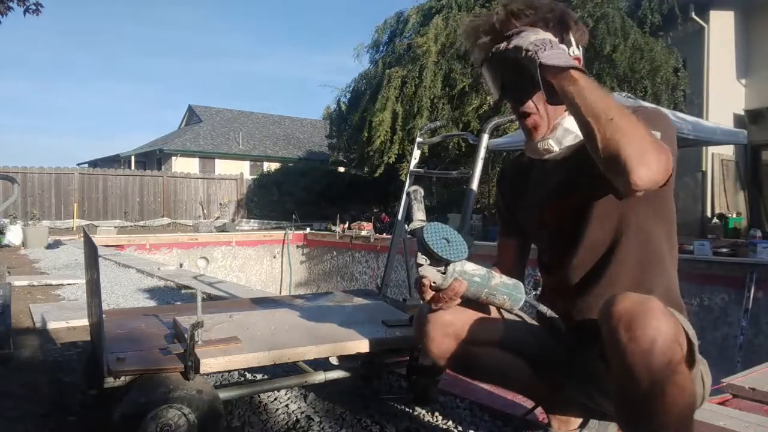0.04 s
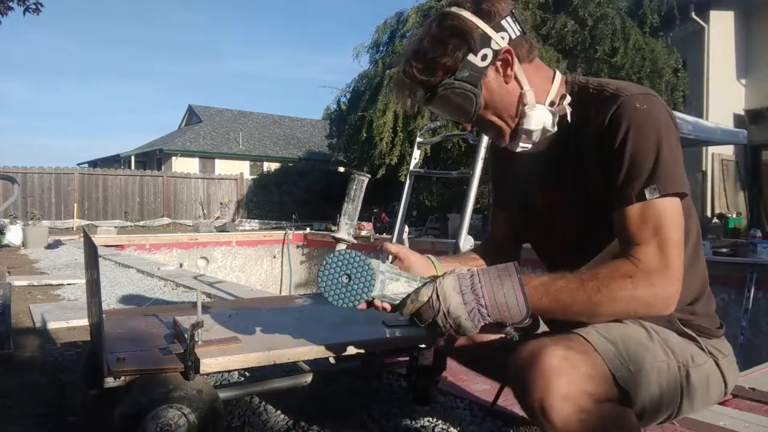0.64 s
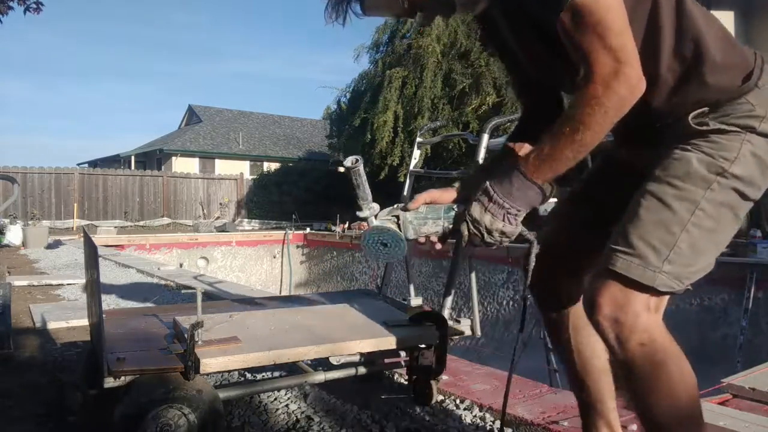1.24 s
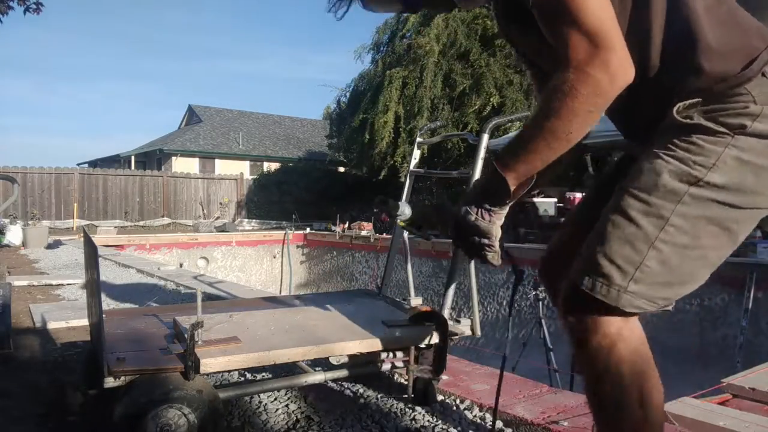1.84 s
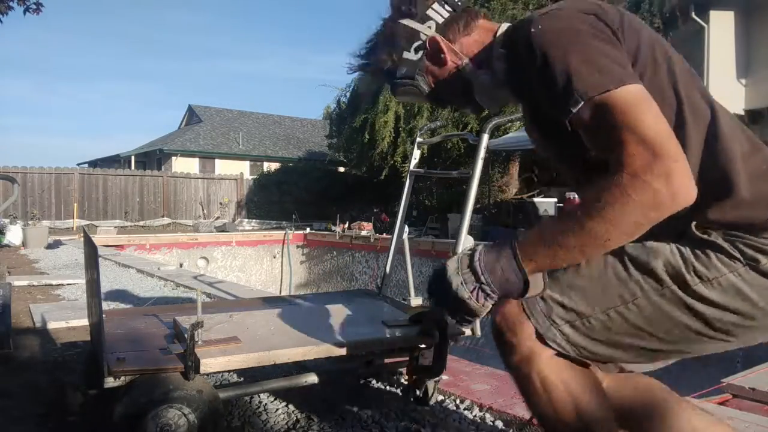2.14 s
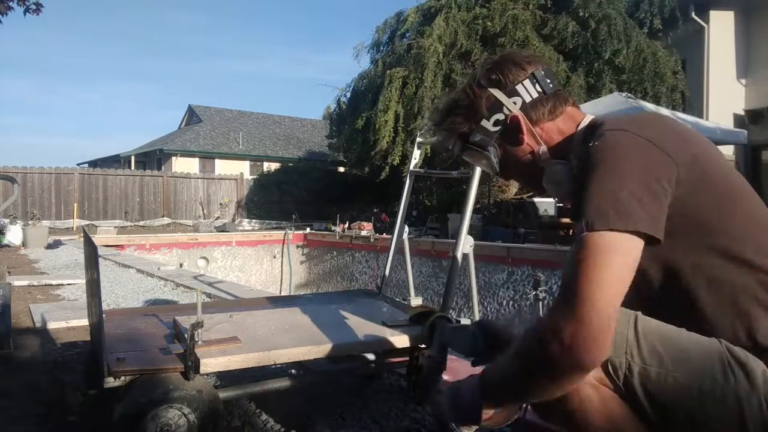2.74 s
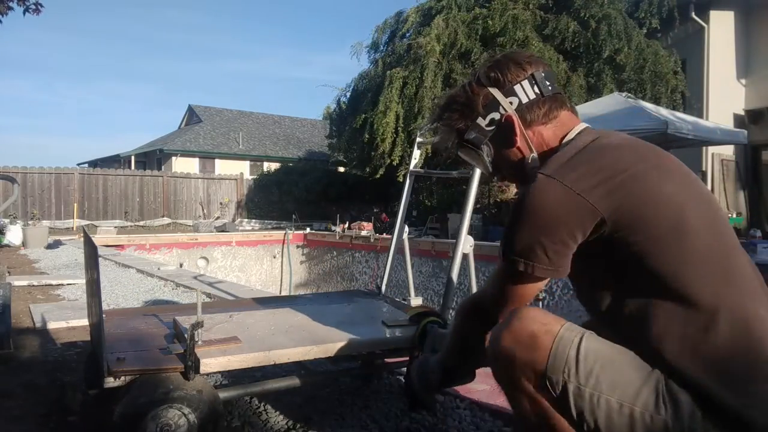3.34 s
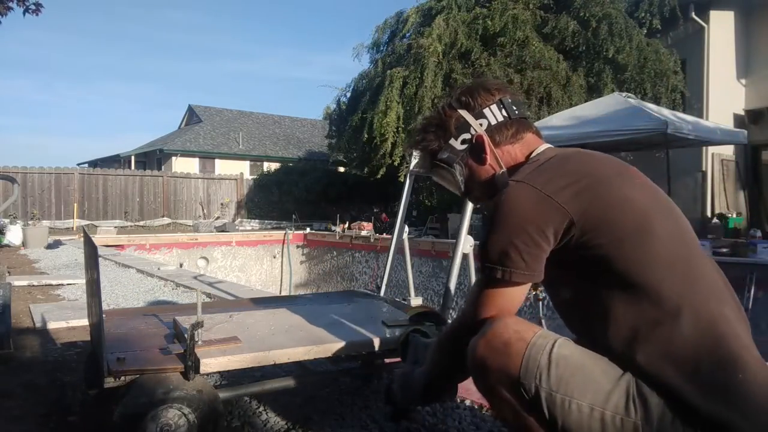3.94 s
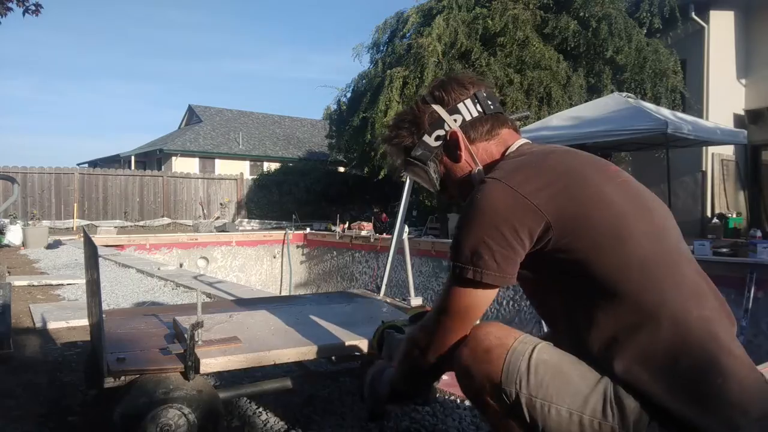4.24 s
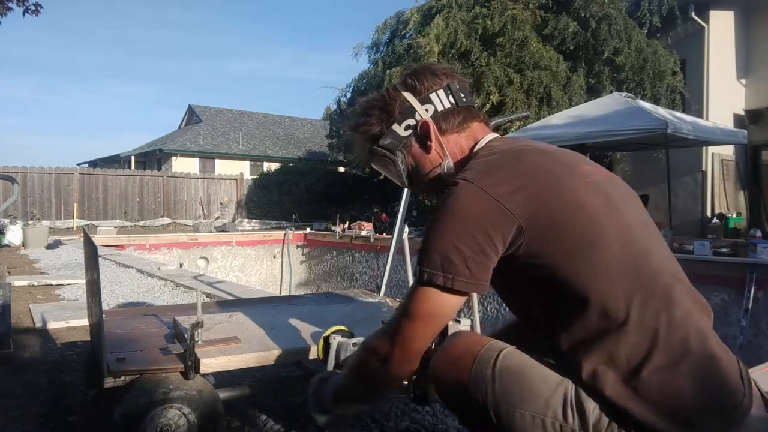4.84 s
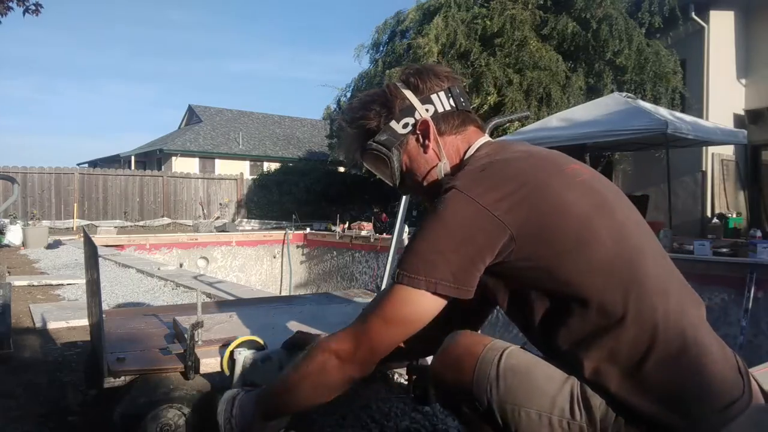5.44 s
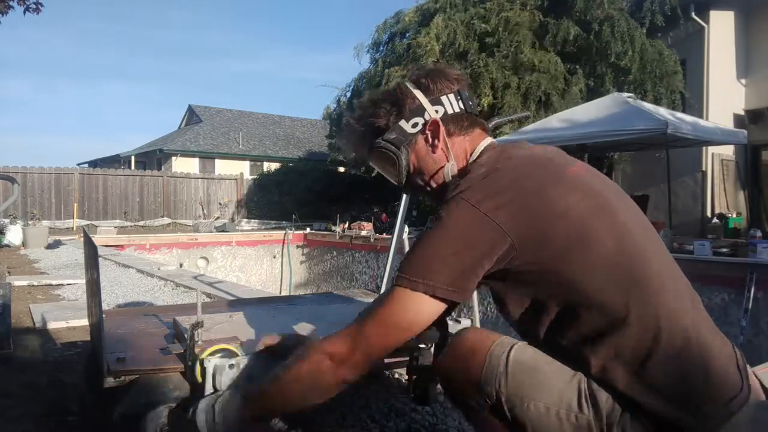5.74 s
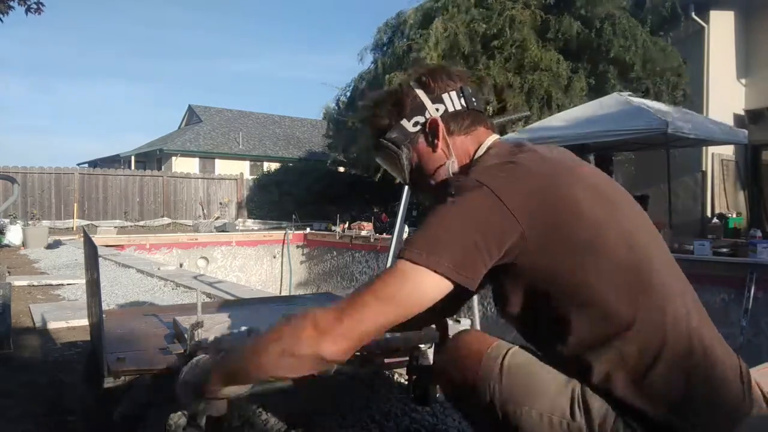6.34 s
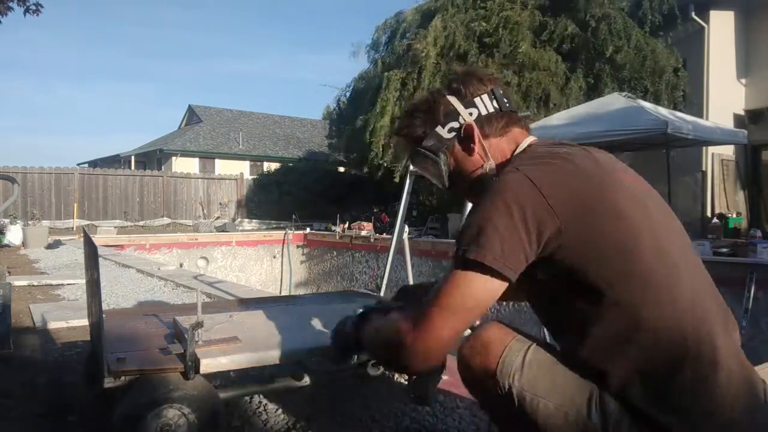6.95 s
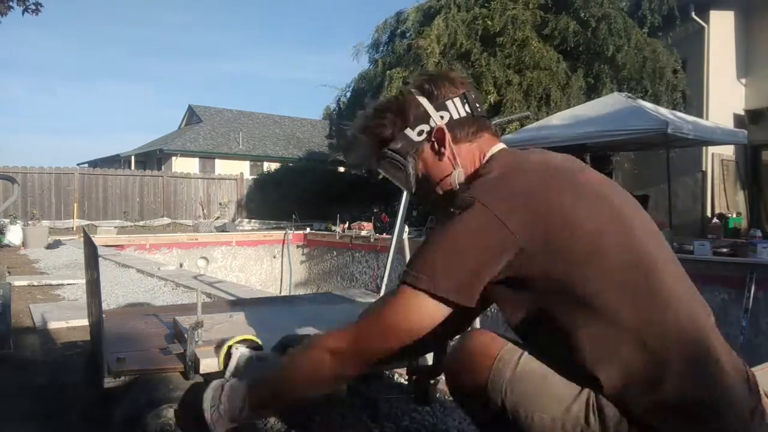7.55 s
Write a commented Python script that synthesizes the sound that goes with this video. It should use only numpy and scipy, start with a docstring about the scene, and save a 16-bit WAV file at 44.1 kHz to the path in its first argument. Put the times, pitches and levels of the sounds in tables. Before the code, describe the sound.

Gloves rustle, then an angle grinder spins up, grinds stone with a rising squeal and shifts into fast, hissing, wavering whistles.

```python
"""Angle grinder polishing stone

In a quiet yard, gloves handle an angle grinder and switch it on. Its gears rattle and whine up to speed.
The polishing pad skips on the edge of a stone slab, bites, drags the motor down and ends in a squeal.
Then the work races by as a time-lapse, twelve times as fast: overtones too high to be carried
fold back down into warbling whistles."""
import sys
import numpy as np
from scipy import signal
from scipy.fft import rfft, irfft, next_fast_len
from scipy.io import wavfile
from scipy.ndimage import uniform_filter1d, map_coordinates

SR = 44100
rng = np.random.default_rng(int(sys.argv[2]) if len(sys.argv) > 2 else 0)


def output_pcm(signal):
    """Save a mono or channel-first signal as 16-bit PCM at the path in sys.argv[1].

    Samples are clipped to [-1, 1] before scaling.
    """
    pcm = np.clip(np.atleast_2d(signal).T, -1, 1) * 32767
    wavfile.write(sys.argv[1], SR, np.round(pcm).astype(np.int16))


N = 335160
T = np.arange(N) / SR
SWITCH_ON_S, LAPSE_START_S = 1.358, 5.712
FREE_SPEED_HZ, MOTOR_LAG_S = 157, .48  # turns a second with no load; how slowly the motor responds
# In the tables, levels compare the rows with each other; the functions set the final loudness.

# Strokes of the pad along the edge: start_s, length_s, rasp_db, grit_db
STROKES = [(3.372, .14, -27, -30.5), (3.515, 0.2, -24.5, -26), (3.73, .1, -29.5, -27.5),
           (3.954, 0.23, -25, -26.5), (4.17, 0.22, -25.5, -28.5), (4.454, 0.24, -24, -30),
           (4.71, 0.32, -24.5, -29), (5.03, 0.31, -26.5, -25.5), (5.35, 0.38, -25, -26)]
# Tone colour of the rasp and of the hissing grit: pitch_hz, level_db
RASP_COLOUR = [(80, -80), (250, -34), (450, -18), (900, -17.5), (1500, -3.5), (2200, -10.5), (2700, 0),
               (3600, -3), (4600, 7), (5600, 2.5), (7200, -3), (8500, -11), (16000, -43)]
GRIT_COLOUR = [(3000, -50), (7000, 7.5), (8000, 0), (10500, 1), (12500, -2.5), (16000, -6.5)]
# Where the slab, the backing disc and the pad ring: pitch_hz, width_hz, level_db
SLAB_RING = [(1876, 240, 0)]
DISC_RING = [(3564, 290, 0)]
PAD_RING = [(6330, 370, 0)]

def grinding(turns, throb_db=2.5, resting_ring_db=-36.5):
    """The pad rasps over stone and loose grit, swelling once a turn and making slab, disc and pad ring."""
    rasp_gain, grit_gain = amp(-32), amp(-35.5)  # between strokes the pad barely touches
    for start, length, rasp_db, grit_db in STROKES:
        press = held(start, length, attack_s=.068, release_s=.091)
        rasp_gain = np.hypot(rasp_gain, amp(rasp_db) * press)
        grit_gain = np.hypot(grit_gain, amp(grit_db) * press)
    throb = unit(amp(throb_db * np.sin(2 * np.pi * turns) + .98 * wobble(250) + .77 * wobble(20)))
    loose = .3 - .1 * after(4.2, .8)  # the rubbing gets less random as the pad beds in

    def rub(random_share):
        return throb * patchy(turning_noise(turns, renew_hz=12) + random_share * noise())

    rasp = amp(2) * rasp_gain * coloured(rub(loose), RASP_COLOUR)
    grit = grit_gain * coloured(rub(2 * loose), GRIT_COLOUR)
    slab = amp(-8.5) * ring_gain("slab", resting_ring_db) * ringing(rub(loose), SLAB_RING)
    disc = amp(-4.5) * ring_gain("disc", resting_ring_db) * ringing(rub(loose), DISC_RING)
    pad = amp(-3) * ring_gain("pad", resting_ring_db) * ringing(rub(2 * loose), PAD_RING)
    return (rasp + grit + slab + disc + pad) * after(3.3, .064)


# Moments when one part rings out: part, peak_s, spread_s, level_db
RING_SWELLS = [("case", 1.57, 0.087, -21), ("rim", 2.18, 0.047, -36), ("rim", 2.945, 0.092, -35.5),
               ("slab", 3.41, 0.044, -19), ("slab", 3.62, 0.083, -27), ("slab", 3.96, 0.032, -19),
               ("slab", 3.8, .02, -25), ("slab", 4.47, 0.034, -24), ("slab", 4.62, 0.037, -21.5),
               ("disc", 3.4, 0.027, -25), ("disc", 3.57, 0.075, -18.5), ("disc", 3.76, 0.037, -27),
               ("disc", 4.04, .05, -35), ("disc", 4.8, .04, -31), ("disc", 5.57, 0.11, -23),
               ("pad", 3.57, 0.043, -22), ("pad", 3.78, .03, -22), ("pad", 4.05, 0.026, -21.5),
               ("pad", 4.33, 0.065, -28), ("pad", 4.61, 0.093, -21.5), ("pad", 4.92, 0.086, -20.5),
               ("pad", 5.07, .025, -20), ("pad", 5.24, .07, -23)]

def ring_gain(part, resting_db):
    """How strongly one part rings: a resting level plus its short swells."""
    swells = sum(amp(db) * swell(s, spread) for name, s, spread, db in RING_SWELLS if name == part)
    return amp(resting_db) + swells


# Tone colour of the gears and of the fan: pitch_hz, level_db
GEAR_COLOUR = [(120, -42), (210, -36), (300, -10.5), (490, -6.5), (840, -1), (1020, -7.5), (1250, -3.5),
               (1500, -3.5), (2400, -3), (3500, 1), (5200, -1), (5700, -9), (7600, -4.5)]
FAN_COLOUR = [(20, -26), (60, -20), (150, -8), (400, -10.5), (7000, 5), (9000, -2), (11500, 1),
              (16000, -6.5)]
# Where the guard, its rim, the gear case and the housing ring: pitch_hz, width_hz, level_db
GUARD_RING = [(1228, 160, -6), (2455, 420, -4.5), (4100, 320, -1.5), (5000, 380, -3.5)]
RIM_RING = [(1913, 335, 0)]
CASE_RING = [(3520, 450, 0)]
HOUSING_RING = [(808, 68, 0)]

def motor(turns, speed, loaded_db=-4, flutter_db=1.5):
    """Gears rattle in housing and guard, the fan hisses and the unbalanced pad hums."""
    build_db = -8 * (1 - after(SWITCH_ON_S, .11))
    gear_db = -24 + build_db + .66 * wobble(12)
    housing_db = -36 - 9 * after(1.96, .34) + flutter_db * wobble(18)
    case_gain = ring_gain("case", -27.2 + 3.7 * after(2.35, .6)) * amp(build_db + flutter_db * wobble(12))
    fan_db = -32 + .11 * (speed - FREE_SPEED_HZ)
    # Slack teeth clatter hardest while the motor speeds up.
    starting = 1 - after(1.346, .3)
    rattle = unit(amp((2 + 3.5 * starting) * np.tanh(wobble(600))))
    repeating = .39 * turning_noise(turns, renew_hz=7)

    def clatter():
        return (noise() + repeating) * rattle

    teeth = unit(filtered(clatter(), lambda hz: gain_at(GEAR_COLOUR, hz) * treble_cut(hz, 7800, 400, -12, 4)))
    # Slow teeth strike softly, so the start is duller.
    soft_teeth = filtered(teeth, lambda hz: treble_cut(hz, 3500, 2000, -6, 3))
    slow = 1 - after(1.43, .4)
    body = amp(gear_db - 3.5) * (slow * soft_teeth + (1 - slow) * teeth)
    body += amp(gear_db - 7) * after(1.17, .61) * ringing(clatter(), GUARD_RING)
    body += ring_gain("rim", -32.5) * after(1.51, .41) * ringing(clatter(), RIM_RING)
    body += case_gain * amp(-8.5 + 6.4 * starting) * ringing(noise() * rattle, CASE_RING)
    body += amp(housing_db) * ringing(noise() * rattle, HOUSING_RING)
    body *= amp(loaded_db * after(3.32, .24))  # quieter once the pad is on the stone
    fan = amp(fan_db) * coloured(noise() * rattle, FAN_COLOUR)
    hum = pad_hum(turns, speed) * after(1.52, .09)
    return (body + fan + hum) * after(SWITCH_ON_S, .0034)


def pad_hum(turns, speed):
    """The unbalanced pad shakes once a turn, louder the faster it spins."""
    return amp(-41 + .35 * (speed - FREE_SPEED_HZ)) * np.sqrt(2) * np.sin(2 * np.pi * turns)


# How fast the pad spins on the stone: time_s, turns_per_s
WORK_SPEED = [(3.34, 155.6), (3.55, 154.4), (3.7, 151.4), (3.78, 148.5), (3.97, 149), (4.02, 147),
              (4.17, 145.6), (4.3, 142.2), (4.48, 142.8), (5.22, 138.5), (5.43, 138.9), (5.51, 138.1),
              (5.69, 134.7)]

def spindle_speed(kick_hz=70, kick_s=.08):
    """Turns a second: a quick kick from rest and a slow climb, until the stone drags the motor down."""
    age = np.maximum(T - SWITCH_ON_S, 0)
    kick = kick_hz * (1 - np.exp(-age / kick_s))
    climb = (FREE_SPEED_HZ - kick_hz) * (1 - np.exp(-age / MOTOR_LAG_S))
    return uniform_filter1d(np.clip(kick + climb, 1, over_time(WORK_SPEED)), size=1500)


# Tone colour of the grit in the squeal: pitch_hz, level_db
SIZZLE_COLOUR = [(5000, -42), (9000, -8), (12500, -6), (15000, 0), (16000, -4)]

def squeal(turns, speed, start_s=4.8, centre_hz=3950, sweep_hz=950):
    """Each turn the pad catches and slips: a short rising chirp with a sizzle of grit."""
    in_turn = turns % 1
    cycles = (centre_hz * in_turn + sweep_hz * (in_turn ** 2 - in_turn) / 2) / speed
    chirp = np.sin(np.pi * in_turn) * np.sin(2 * np.pi * cycles + .3 * wobble(200))
    sizzle = amp(-12) * coloured(turning_noise(turns, renew_hz=18), SIZZLE_COLOUR)
    level_db = -39.5 + 18 * after(start_s, .47) + .67 * wobble(40)
    return amp(level_db) * (unit(chirp) + sizzle) * after(start_s, .05)


# Time-lapse pushes (negative drag eases off): start_s, length_s, drag_turns_per_s, whistle_db
PUSHES = [(5.7, .06, 7.5, -38), (5.932, 0.098, 4.5, -47), (6.095, .06, 5, -33.5), (6.24, .08, 16, -40),
          (6.322, .022, -2, -28), (6.346, .077, 5.5, -31.5), (6.422, .025, -7, -48),
          (6.446, .056, 1, -31.5), (6.503, 0.094, 8.7, -30.5), (6.61, .069, 3.4, -29.5),
          (6.678, .034, 15.5, -25.5), (6.711, .062, 9, -31.5), (6.775, 0.061, 1.6, -32),
          (6.837, .05, 11, -28.5), (6.895, 0.092, 11, -29), (7.04, .043, -.5, -32),
          (7.082, 0.063, 9.5, -28), (7.15, .024, 22.5, -26.5), (7.181, 0.056, 7, -30),
          (7.234, 0.054, 17.5, -26.5)]

def pushes(edge_s=.00985, fade_s=.0069, swell_db=3.5):
    """Each push drags on the motor and makes the pad bite harder; at the end the pad lifts off briefly."""
    contact = 1 - held(7.285, .185, edge_s, edge_s)
    drag, bite = 15 * contact, amp(-40.5)  # from the tool's own weight
    for start, length, push_drag, db in PUSHES:
        drag += push_drag * held(start, length, edge_s, edge_s)
        whistling = after(start, edge_s) * np.exp(-np.maximum(T - start - length, 0) / fade_s)
        bite = np.hypot(bite, whistling * amp(db + swell_db * (after(start, length) - .5)))
    return contact, drag, bite


# Overtones of the pressed pad: cycles_per_turn, level_db
PAD_OVERTONES = [(20, -11), (21, -9), (22, 0), (23, -2), (24, -3), (25, 0), (26, -4), (27, -2), (28, 2),
                 (29, -2), (30, -6), (31, -10), (35, -15)]
# Loudness of the time-lapse hiss: time_s, level_db
HISS_LEVELS = [(5.72, -31.5), (6.3, -32), (6.7, -36.5), (7.3, -32), (7.6, -32)]
# Its nearly even tone colour: pitch_hz, level_db
HISS_COLOUR = [(20, -2.2), (700, -2.6), (2000, -2.1), (6000, -1.3), (11000, 0.52), (16000, 1)]

def time_lapse(speed_up=12, fold_hz=48000, tremor_hz=.8):
    """Sped-up grinding: the hum is higher, overtones fold down into whistles and the rasp is a hiss."""
    contact, drag, bite = pushes()
    # The motor sags under the unsteady hand and recovers with a lag.
    lag = np.exp(-speed_up / (MOTOR_LAG_S * SR))
    speed = FREE_SPEED_HZ - signal.lfilter([1 - lag], [1, -lag], drag + tremor_hz * wobble(70))
    turns = np.cumsum(speed) * speed_up / SR
    late = T > LAPSE_START_S - .1
    t = T[late]

    def folded(order, fold):
        """An overtone sounds at its distance from a multiple of fold_hz (aliasing)."""
        return np.sin(2 * np.pi * (order * turns[late] - fold * fold_hz * t) + .75 * wobble(300, t))

    # The overtones trade strength while their total power stays the same.
    multiples, levels = np.transpose(PAD_OVERTONES)
    orders = range(int(multiples[0]), int(multiples[-1]) + 1)
    order_db = np.interp(orders, multiples, levels)
    gains = np.array([amp(db + 3 * wobble(90, t) + 2 * wobble(20, t)) for db in order_db])
    gains /= np.linalg.norm(gains, axis=0)
    whistles, chirps = np.zeros(N), np.zeros(N)
    whistles[late] = unit(sum(gain * folded(k, 1) for gain, k in zip(gains, orders)))
    chirps[late] = unit(sum(amp(5 * wobble(45, t)) * folded(k, 2) for k in range(48, 58)))
    hiss = amp(over_time(HISS_LEVELS) + .8 * wobble(60)) * coloured(noise(), HISS_COLOUR)
    return hiss + contact * (bite * whistles + amp(-41) * chirps) + amp(-2) * pad_hum(turns, speed)


# Steady tones of spindle and gears: cycles_per_turn, level_db
RUNNING_WHINES = [(2, -59.5), (3.15, -50.5), (12.6, -46), (22.6, -36.5), (27.8, -40), (39.4, -35.5)]
# Tones that flare while spinning up: cycles_per_turn, peak_s, spread_s, level_db, roughness_rad
SPIN_UP_WHINES = [(37.5, 1.435, 0.011, -20, 0.87), (39.3, 1.66, 0.085, -36, 1.8),
                  (75.8, 1.515, 0.06, -33.5, 2.9), (51.5, 1.795, .008, -26, .5), (130, 1.83, 0.16, -39, .6)]

def whines(turns):
    """Gears and rotor whine in step with the speed; some tones flare in the casing on the way up."""
    def tone(multiple, roughness):
        return np.sin(2 * np.pi * multiple * turns + roughness * wobble(300))

    running = sum(amp(db) * tone(k, k / 20) for k, db in RUNNING_WHINES) * after(1.8, .94)
    flares = sum(amp(db) * swell(s, spread) * tone(k, rough) for k, s, spread, db, rough in SPIN_UP_WHINES)
    return (running + flares) * after(SWITCH_ON_S, .031)


# Bounces of the pad as it first touches: peak_s, level_db, spread_s
SKIPS = [(3.154, -17, 0.007), (3.195, -19, 0.0076), (3.225, -22.5, 0.0089), (3.277, -24.5, 0.007),
         (3.311, -24.5, 0.01)]

def skips(turns):
    """Before it settles the pad bounces, scratching the edge for a few turns each time."""
    touch = sum(amp(db) * swell(s, spread) for s, db, spread in SKIPS)
    scratch_colour = [(1000, -34), (2700, -21), (3500, 3), (4400, -6),  # pitch_hz, level_db
                      (5700, -.5), (8500, -8.5), (12000, -5), (16000, -19)]
    throb = unit(amp(2.8 * np.sin(2 * np.pi * turns)))
    return touch * throb * coloured(noise(), scratch_colour)


# Gloves and clothes brushing the tool: peak_s, level_db, rise_s
BRUSHES = [(.47, -56.5, 0.0082), (.57, -46, .004), (.64, -53.5, 0.043), (.848, -57, .008),
           (.965, -40, 0.039), (1.186, -44.5, 0.0029), (1.268, -47, 0.019)]
# Tone colour of the cloth: pitch_hz, level_db
CLOTH_COLOUR = [(47, -48), (80, -19), (289, -1), (378, -1.5), (917, 3), (1490, -10), (1900, -5.5),
                (3540, -6.5), (4520, -4.5), (13700, -19.5), (16000, -28)]

def gloves(fall_ratio=3.24):
    """Cloth rubs on the tool; each rustle fades more slowly than it rises."""
    brush = sum(amp(db) * np.exp(-np.maximum(s - T, (T - s) / fall_ratio) / rise) for s, db, rise in BRUSHES)
    return brush * coloured(noise() * amp(2.3 * wobble(600)), CLOTH_COLOUR)


# Knocks of the tool and its switch: start_s, level_db, brightness_db
CLICKS = [(0.565, -42, -12), (0.842, -41, -8), (0.948, -32, 4), (0.968, -29, 11), (1.028, -32.5, -6),
          (1.184, -33, -9), (1.359, -21.5, 5), (1.386, -24, -18)]
# Tone colour of a knock: pitch_hz, level_db
KNOCK_COLOUR = [(100, -14), (300, -15), (800, -3.5), (1200, -25), (2000, 9), (3000, -10), (4200, 11),
                (8000, 1), (16000, -35)]

def clicks(knock_s=.045, tick_s=.018):
    """Body and switch click: a hollow knock and a shorter bright tick, each dying away by 60 dB."""
    knocks, ticks = np.zeros(N), np.zeros(N)
    for start, db, bright_db in CLICKS:
        first = round(start * SR)
        age = T[:N - first]
        knocks[first:] += amp(db - 10 - 60 * age / knock_s)
        ticks[first:] += amp(db + bright_db - 14 - 60 * age / tick_s)
    body = coloured(noise(), KNOCK_COLOUR) + amp(-1) * ringing(noise(), HOUSING_RING + RIM_RING)
    return knocks * body + ticks * noise()


# Tone colour of the quiet yard: pitch_hz, level_db
YARD_COLOUR = [(15, -40), (25, -25), (70, -8), (97, -10), (127, -8.5), (223, -16.5), (911, -16.5),
               (1610, -24.5), (1790, -20.5), (2840, -26.5), (7710, -28.5), (8360, -37), (14000, -24),
               (16000, -41)]

def yard():
    """A faint, low outdoor rush that wavers slightly."""
    return amp(-60.5 + .36 * wobble(6)) * coloured(noise(), YARD_COLOUR)


def turning_noise(turns, renew_hz, size=512):
    """The same roughness comes round every turn; wear slowly replaces the pattern."""
    patterns = rng.standard_normal((int(N * renew_hz / SR) + 3, size // 2))
    patterns = signal.resample(patterns, size, axis=1)
    return unit(map_coordinates(patterns, [T * renew_hz, turns * size], order=2, mode="grid-wrap"))


def patchy(x, depth_db=2.5):
    """The contact point wanders: bands a few hundred Hz wide come and go."""
    bands = signal.stft(x, nperseg=512)[2]
    patches = uniform_filter1d(rng.standard_normal(bands.shape), size=5, axis=0)  # smooth across pitch
    patches = uniform_filter1d(patches, size=14, axis=1)  # and across time
    return unit(signal.istft(bands * amp(depth_db * unit(patches)), nperseg=512)[1][:N])


def amp(db):
    """Decibels to gain."""
    return 10 ** (np.asarray(db) / 20)


def unit(x):
    """Scale to an average (rms) level of 1."""
    return x / np.sqrt(np.mean(x ** 2) + 1e-20)


def noise():
    """White noise."""
    return rng.standard_normal(N)


def wobble(rate_hz, t=T):
    """A smooth random curve through rate_hz points a second."""
    coarse = t[::16]
    points = rng.standard_normal(int(N * rate_hz / SR) + 4)
    return unit(np.interp(t, coarse, map_coordinates(points, [coarse * rate_hz], order=2)))


def after(start_s, rise_s):
    """Rises from 0 to 1, beginning at start_s."""
    return np.clip((T - start_s) / rise_s, 0, 1)


def held(start_s, length_s, attack_s, release_s):
    """Rises, holds and falls."""
    rise = after(start_s - attack_s / 2, attack_s)
    return rise * (1 - after(start_s + length_s - release_s / 2, release_s))


def swell(peak_s, spread_s):
    """A bell-shaped rise and fall."""
    return np.exp(-.5 * np.clip((T - peak_s) / spread_s, -10, 10) ** 2)


def over_time(rows):
    """Joins (time_s, value) rows with straight lines."""
    return np.interp(T, *np.transpose(rows))


def gain_at(colour, hz):
    """Reads a (pitch_hz, level_db) table as a gain at any pitch."""
    pitches, levels = np.transpose(colour)
    return amp(np.interp(np.log(hz + 1), np.log(pitches + 1), levels))


def treble_cut(hz, from_hz, step_hz, step_db, steps):
    """A gain that slopes down above from_hz, then levels off."""
    return amp(step_db * np.clip((hz - from_hz) / step_hz, 0, steps))


def filtered(x, response):
    """Scales each frequency in x by response(hz)."""
    size = next_fast_len(len(x) + 8192, True)
    return irfft(rfft(x, size) * response(np.fft.rfftfreq(size, 1 / SR)), size)[:len(x)]


def coloured(x, colour):
    """Gives x a tone colour, at level 1."""
    return unit(filtered(x, lambda hz: gain_at(colour, hz)))


def ringing(x, rings):
    """Passes x through steep resonances, at level 1."""
    def peak(hz, pitch, width):
        return (2j * hz * width / (pitch ** 2 - hz ** 2 + 2j * hz * width)) ** 2

    return unit(filtered(x, lambda hz: sum(amp(db) * peak(hz, pitch, width) for pitch, width, db in rings)))


def scene():
    """The grinder in the yard gives way to its time-lapse; both channels are the same."""
    speed = spindle_speed()
    turns = np.cumsum(speed) / SR
    work = motor(turns, speed) + whines(turns) + grinding(turns) + skips(turns) + squeal(turns, speed)
    crossfade = after(LAPSE_START_S - .014, .019)
    mono = yard() + gloves() + clicks() + (1 - crossfade) * work + crossfade * time_lapse()
    return np.array([mono, mono])


def record(dry, top_hz=15850):
    """Removes the highest treble."""
    return np.array([filtered(channel, lambda hz: hz < top_hz) for channel in dry])


dry = scene()
out = record(dry)
output_pcm(out)
```